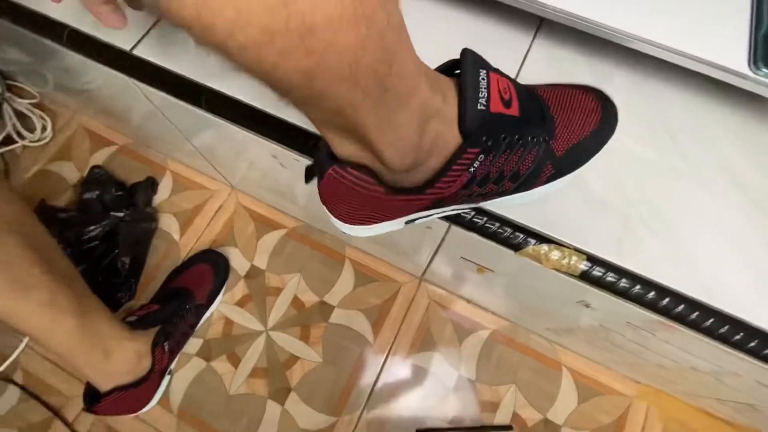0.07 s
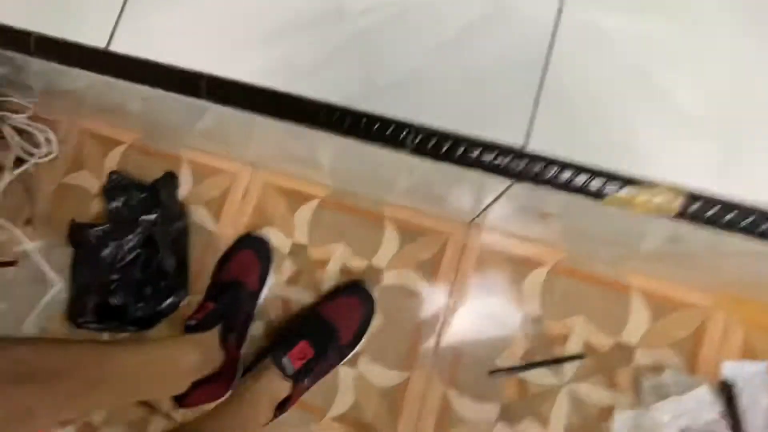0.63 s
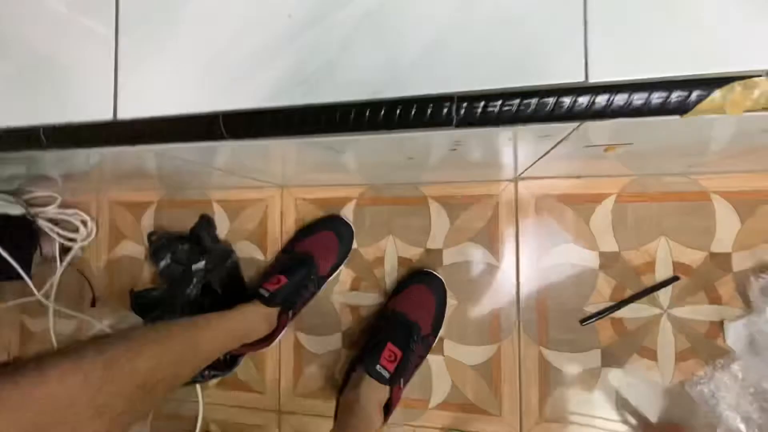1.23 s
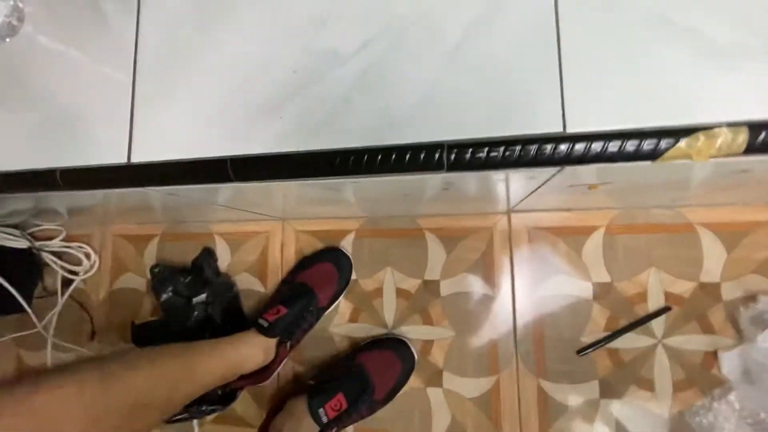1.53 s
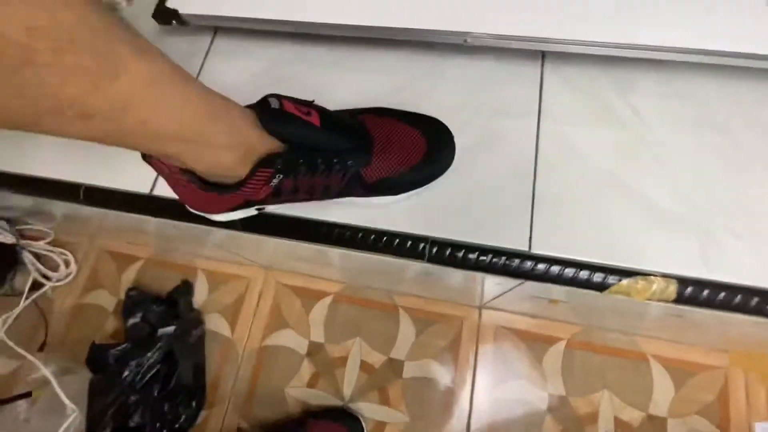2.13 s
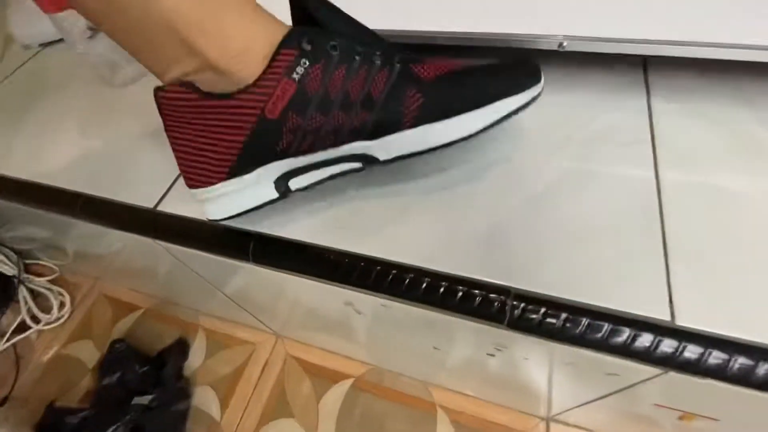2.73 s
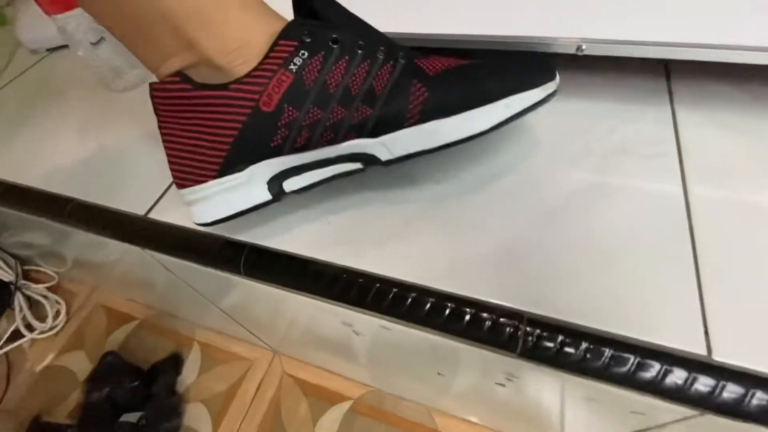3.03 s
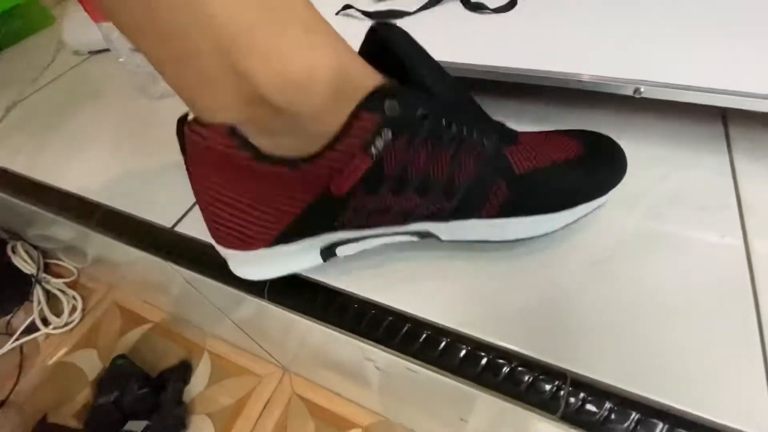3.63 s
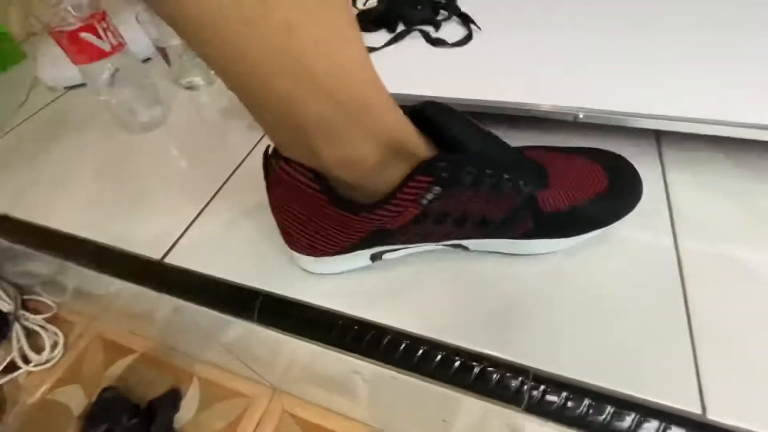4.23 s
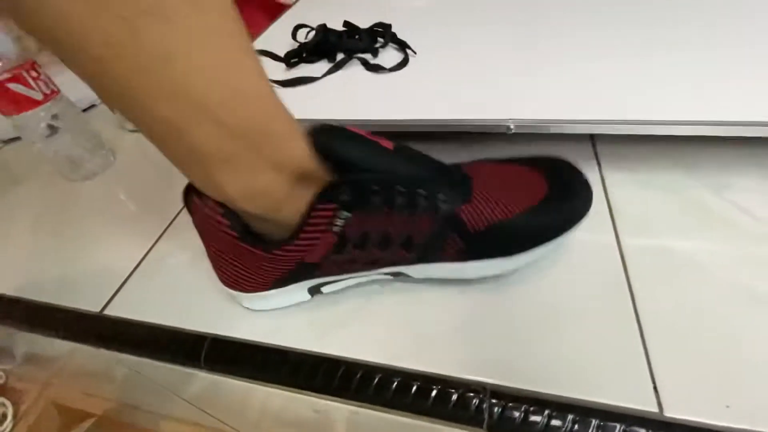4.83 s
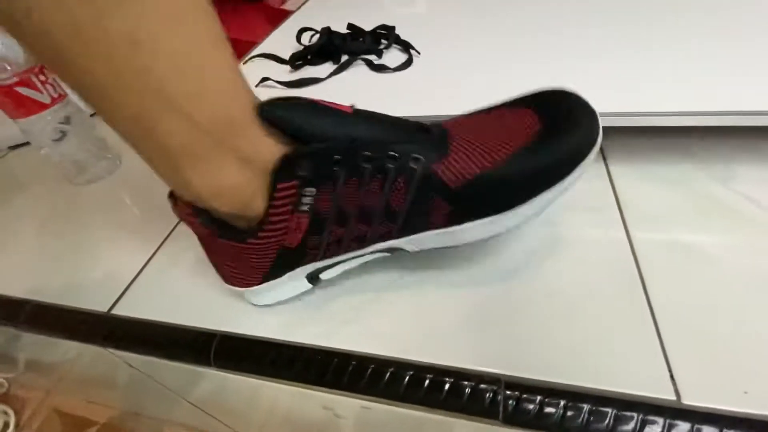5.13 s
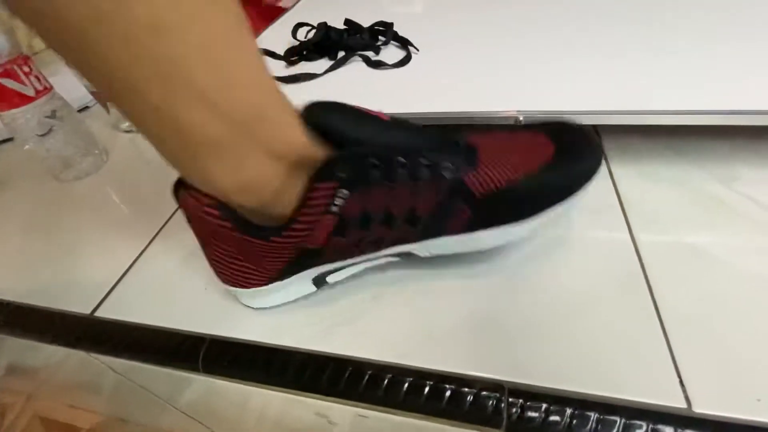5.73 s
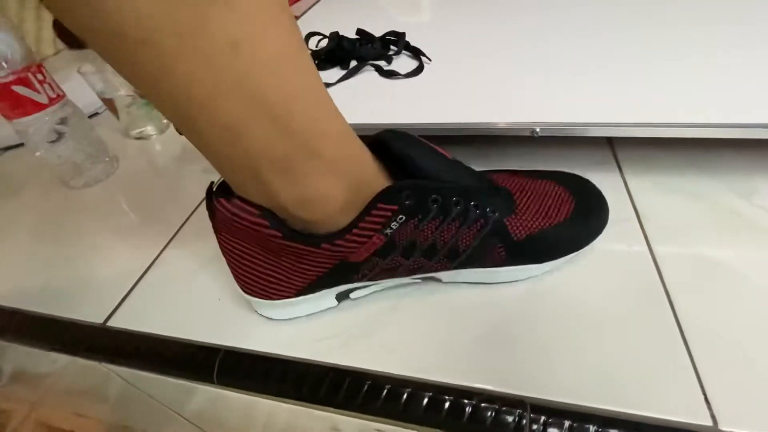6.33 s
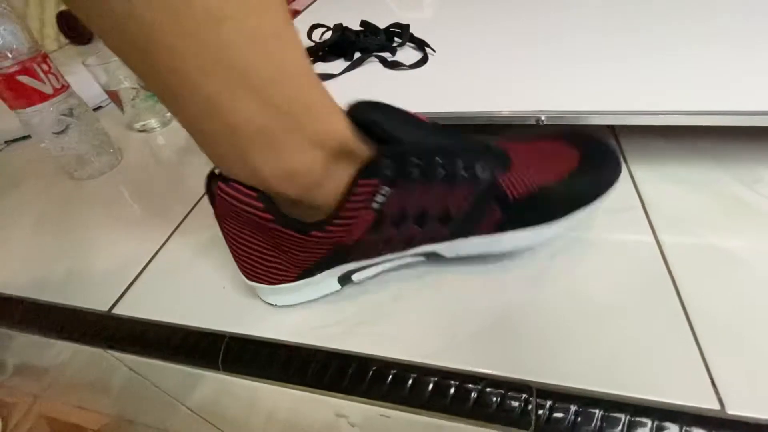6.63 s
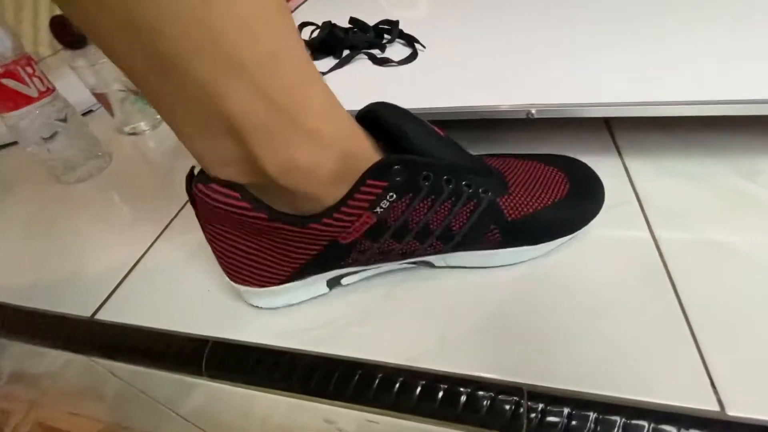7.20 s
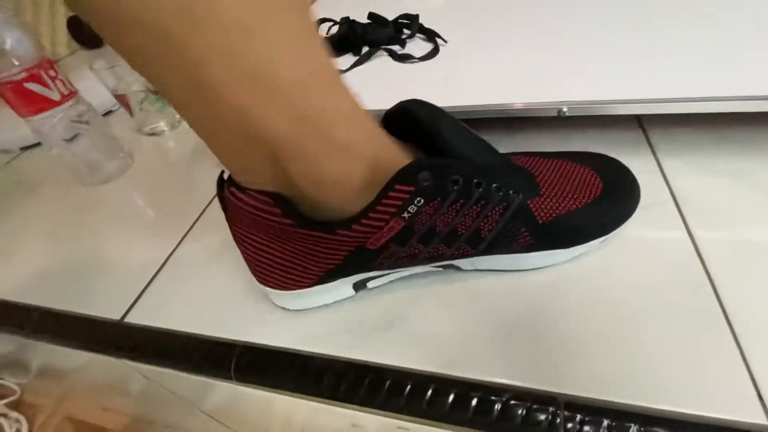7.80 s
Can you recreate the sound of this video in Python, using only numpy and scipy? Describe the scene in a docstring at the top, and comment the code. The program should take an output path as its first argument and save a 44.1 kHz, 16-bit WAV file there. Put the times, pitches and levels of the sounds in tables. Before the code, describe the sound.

A rubber-soled sneaker moves on hard tile, heard close up in a small room that rings briefly. It opens with a light bump and soft fabric rubbing, then a hollow knock at 0.6 seconds as the shoe is set down. From 1 to 1.6 seconds come light bumps and scratchy rustles as a foot works its way in. A step lands at 2.1 seconds, followed by a faint sliding hiss until 2.8 and a near-quiet pause. Another step comes at 3.6 seconds and a heavy one at 4. Six slapping toe taps follow from 4.5 to 6.2 seconds, about three a second, with a sharper seventh at 6.8. Two hard heel stamps hit at 7.4 and 7.7 seconds, slightly to the left, each a knock with a low thump. The knitted upper scuffs softly between hits, above a very faint rumble of air.

```python
"""In a small room with a hard tile floor, a sneaker is put down, then a foot works its way in,
taps it and stamps it. Each touch of the rubber sole is a hollow knock, a slap, a tick and a low
thump, and the room rings briefly. A step rolls over heel, ball and toe, a toe tap is three quick
touches, a stamp is a faint graze and one hard hit. In between, the knitted upper rubs on the foot
and the sole slides over the tile, above a faint rumble of air."""
import sys
import numpy as np
from scipy import signal
from scipy.fft import rfft, irfft, next_fast_len
from scipy.io import wavfile

SR = 44100
rng = np.random.default_rng(int(sys.argv[2]) if len(sys.argv) > 2 else 0)


def store_pcm(level_fs):
    """Save levels as 16-bit WAV."""
    pcm = np.round(np.clip(level_fs, -1, 1) * 32767).astype(np.int16)
    wavfile.write(sys.argv[1], SR, np.atleast_2d(pcm).T)


N = 351036
TIME = np.arange(N) / SR
EAR_GAP_S = 0.00078   # sound's travel time between the left and right listening points
SLAP_HZ = 2260   # pitch of the slap, except in toe taps

# How the room echoes: pitch_hz, level_db, fade_s (time to fall by 60 dB)
ROOM_ECHO = [(59.7, -2.5, 0.84), (116, -12, 0.87), (167, 2, 0.47), (245, -1.5, 0.45), (480, -3.5, 0.29),
             (970, 1.5, 0.25), (2200, 3.5, 0.26), (4430, -3, 0.22), (8100, 4, 0.14), (13300, -26.5, 0.6)]
# Toe taps: start_s, roll_s, first_db, middle_db (these two adjust the early touches),
# then for the last touch: knock_db, pitch_hz, slap_db, slap_hz, tick_db, thump_db
TOE_TAPS = [(4.46, 0.012, 1.5, -8, 11, 650, 5, 1674, -12, 15),
            (4.8303, 0.0095, -7, -17.5, 9.5, 944, 2, 1500, -12.5, 15),
            (5.1682, 0.006, -7.5, -5, 14.5, 600, 12, 2350, -2, 20.5),
            (5.5369, .0052, -2, -5.5, 12, 500, 13, 2010, -4.5, 21),
            (5.886, .005, -1.5, -7.5, 11.5, 475, 11, 2070, -4, 21.5),
            (6.2077, 0.0044, -15.5, -8, 16.5, 735, 17.5, 1800, -0.5, 21.5),
            (6.8483, .0036, -11, -10, 20, 1050, 16, 2350, 0.5, 23)]


def from_db(db):
    """Turn decibels into a gain to multiply by."""
    return 10 ** (np.asarray(db) / 20)


def rms_one(x):
    """Scale a sound to an average strength (rms) of 1."""
    return x / np.sqrt(np.mean(x ** 2) + 1e-20)


def at_hz(table, hz, column=1):
    """Read a table at any pitch, blending between its rows."""
    table = np.array(table)
    return np.interp(np.log(hz + 1), np.log(table[:, 0]), table[:, column])


def pan(left_db):
    """Two gains that make the left side louder than the right by left_db."""
    return from_db(np.array([[.5], [-.5]]) * left_db)


def drift(turns_per_s):
    """A random curve that wanders around 0, typically by 1."""
    points = rng.standard_normal(int(N / SR * turns_per_s) + 2)
    return rms_one(np.interp(TIME * turns_per_s, np.arange(len(points)), points))


def later(x, delay_s):
    """Delay a sound."""
    samples = np.arange(len(x))
    return np.interp(samples - delay_s * SR, samples, x, left=0)


def resonance(x, hz, q):
    """Let a sound ring at one pitch, twice over; a higher q rings longer."""
    b, a = signal.iirpeak(min(hz, .4 * SR), max(q, hz / SR * 2.5), fs=SR)
    return signal.lfilter(b, a, signal.lfilter(b, a, x + 1e-18))


def diffuse_noise(size):
    """Noise from all sides: left and right are alike in the bass, unrelated in the treble."""
    mid, side = rfft(rng.standard_normal((2, size)))
    alike = .9 * np.sinc(2 * EAR_GAP_S * np.fft.rfftfreq(size, 1 / SR))
    return irfft(np.sqrt(1 + alike) * mid + np.sqrt(1 - alike) * side * [[1], [-1]], size)


def coloured(noise, tone):
    """Shape a noise's lows and highs by a tone table, at strength 1."""
    size = next_fast_len(N)
    gains = from_db(at_hz(tone, np.fft.rfftfreq(size, 1 / SR)))
    return rms_one(irfft(rfft(noise, size) * gains, size)[:, :N])


def room_air():
    """A faint, low rumble of air that swells and sinks."""
    # Tone of the air: pitch_hz, level_db
    air_tone = [(15, -50.5), (25, -11.5), (48, 0.5), (70, 8), (87, -11.5), (195, -2.5), (217, -18),
                (624, -31), (911, -37.5), (1130, -37), (1560, -29), (4870, -38.5), (5430, -40),
                (8830, -32.5), (12000, -45), (16000, -67)]
    return from_db(-62.5 + 4.9 * drift(32)) * coloured(diffuse_noise(N), air_tone)


def standing_waves(age):
    """Notes ring between the walls; the higher ones tend to be more out of step left and right."""
    # The room's own notes: pitch_hz, level_db
    wall_notes = [(61, -58), (121, -59), (161, -54), (194, -56), (290, -67.5), (309, -60.5), (331, -64.5),
                  (466, -52.5), (519, -52), (689, -67), (773, -54), (985, -59.5), (1098, -59.5),
                  (1344, -61), (1682, -62), (2129, -61.5), (2415, -54)]
    ringing = 0
    for pitch_hz, level_db in wall_notes:
        phase = np.pi * pitch_hz * EAR_GAP_S * rng.uniform(0.24, 1) * np.array([[1], [-1]])
        fade_db = 60 * age / at_hz(ROOM_ECHO, pitch_hz, column=2)
        ringing = ringing + from_db(level_db - fade_db) * np.cos(2 * np.pi * pitch_hz * age + phase)
    return ringing


def room_echo(x, early_db, early_s, late_db):
    """Nearby furniture answers at once, then the walls ring on, longest in the bass."""
    age = np.arange(SR) / SR
    hz = np.fft.rfftfreq(SR, 1 / SR)
    noise = rfft(diffuse_noise(SR))
    edges_hz = np.geomspace(40, 18000, 19)
    tail = 0
    for low, high in zip(edges_hz, edges_hz[1:]):
        centre_hz = np.sqrt(low * high)
        band = irfft(noise * ((hz >= low) & (hz < high)), SR)
        early = from_db(early_db) * np.exp(-age / early_s)
        late = from_db(late_db - 60 * age / at_hz(ROOM_ECHO, centre_hz, column=2))
        fade = np.hypot(early, late)
        strength = from_db(at_hz(ROOM_ECHO, centre_hz)) * band.std() * np.sqrt(np.mean(fade ** 2))
        tail = tail + strength * rms_one(band * fade)
    fade_in = np.clip(age / 0.0008 - .4, 0, 1)
    echo = (tail + standing_waves(age)) * fade_in
    return signal.fftconvolve(x[None], echo, axes=1)[:, :N]


def friction(tone, snaps_per_s, snap_gain, flutter_db):
    """Surfaces catch and slip: tiny snaps of uneven size on a fluttering hiss."""
    grip = from_db(flutter_db * drift(110))
    sizes = from_db(4 * np.minimum(rng.exponential(1, N), 3.5)) * rng.choice([-1, 1], N)
    snaps = (rng.random(N) < grip * snaps_per_s / SR) * sizes
    return coloured((diffuse_noise(N) + snap_gain * rms_one(snaps)) * grip, tone)


def stroke(start_s, length_s, level_db, swell_db, release_s, attack_s=0.014):
    """Gain of one rubbing movement: it eases in, swells or sags, and dies away."""
    gain = np.zeros(N)
    span = (TIME >= start_s - 2 * attack_s) & (TIME < start_s + length_s + 10 * release_s)
    age = TIME[span] - start_s
    ease_in = 1 / (1 + np.exp(3 * (1 - age / attack_s)))
    held = from_db(level_db + swell_db * np.clip(age / length_s, 0, 1))
    gain[span] = ease_in * held * np.exp(-np.maximum(age - length_s, 0) / release_s)
    return gain


def sole_slide():
    """The sole slides lightly over the glazed tile with a fine hiss."""
    # Tone of rubber on glaze: pitch_hz, level_db
    glaze_tone = [(1470, -35), (2500, -9.5), (5450, -6), (6780, 0), (7640, -9), (8300, -3), (11900, -20.5),
                  (12700, -21), (13000, -53), (15000, -37.5)]
    gain = stroke(start_s=2.07, length_s=0.74, level_db=-62, swell_db=4, release_s=0.086, attack_s=0.11)
    return gain * friction(glaze_tone, snaps_per_s=6600, snap_gain=0.28, flutter_db=-0.5)


def rubbing_strength():
    """Gains of scuff and fabric hiss as the foot rubs and the shoe flexes and catches."""
    # The foot strokes the knitted upper: start_s, length_s, scuff_db, hiss_db, swell_db
    rubs = [(0.0, 0.17, -54, -62.5, -10.5), (0.136, 0.029, -49, -54, -2), (0.195, 1, -64.5, -61.5, -33),
            (0.832, 0.087, -48.5, -52, 3.5), (1.03, 0.063, -45, -43, -4), (1.214, 0.075, -59, -64, 10),
            (1.363, 0.14, -50.5, -61, -2), (1.495, 0.091, -48, -50, 1.5), (1.667, 0.28, -65, -64.5, -10),
            (1.887, 0.27, -62, -64.5, 3), (2.203, 0.43, -59.5, -62.5, -12), (2.559, 0.23, -58, -63, -9),
            (2.81, 0.39, -76.5, -82.5, -5), (3.132, 0.21, -74, -79, 0), (3.454, 0.059, -69, -75, -4.5),
            (3.586, 0.1, -59, -65.5, 2), (3.773, 0.14, -50, -55, -6.5), (3.966, 0.0079, -36, -41, 2),
            (4.09, .3, -61.5, -68.5, 0), (4.586, 0.069, -50, -53, -5), (4.737, 0.025, -58.5, -58, -5),
            (4.921, 0.21, -52.5, -56.5, -12), (5.269, 0.061, -52, -58.5, 0.5),
            (5.627, 0.07, -55, -59.5, 0.5), (5.972, 0.19, -52.5, -56, -15),
            (6.543, 0.084, -52.5, -57.5, -2), (6.618, 0.11, -57, -61, -2.5),
            (7.129, 0.034, -51, -52.5, 5.5), (7.193, 0.029, -49, -52, 6), (7.319, 0.064, -56, -63.5, 10.5),
            (7.566, 0.029, -49, -52, 4), (7.637, 0.048, -52, -57.5, -1)]
    # The shoe catches and lets go with a short rasp: start_s, scuff_db, hiss_db
    rasps = [(1.034, -73, -47), (1.264, -57, -53), (1.382, -42, -56), (2.777, -68, -69), (3.295, -60, -87),
             (3.614, -52, -67), (4.198, -42.5, -55), (4.604, -44, -48), (4.954, -49, -65),
             (5.329, -62, -44), (5.692, -66, -46.5), (6.032, -64, -48), (7.582, -44, -50)]
    flex_s, rasp_decay_s = .028, 0.0027
    # The shoe flexes just before each tap (same columns as rubs).
    flexes = [(tap_s - flex_s, flex_s, -48.5, -59.5, 9) for tap_s, *_ in TOE_TAPS]
    gains = from_db([[-80], [-87.5]]) * np.ones(N)   # the foot is never quite still
    for start_s, length_s, scuff_db, hiss_db, swell_db in rubs + flexes:
        gains[0] = np.maximum(gains[0], stroke(start_s, length_s, scuff_db, swell_db, release_s=0.046))
        gains[1] = np.maximum(gains[1], stroke(start_s, length_s, hiss_db, swell_db, release_s=0.039))
    gains *= from_db(0.8 * drift(49))   # it never presses evenly
    for start_s, scuff_db, hiss_db in rasps:
        start = int(start_s * SR)
        fade = np.exp(-TIME[:min(SR // 4, N - start)] / rasp_decay_s)
        gains[:, start:start + len(fade)] += from_db([[scuff_db], [hiss_db]]) * fade
    return gains


def shoe_rubbing():
    """The foot rubs in the shoe: a dull scuff and a bright hiss of knitted threads."""
    # Tone of the scuff: pitch_hz, level_db
    scuff_tone = [(100, -7.5), (180, -6), (280, -7), (400, -6), (550, -5.5), (950, -3), (1400, -9),
                  (2300, -10), (3500, -16.5), (6000, -34.5)]
    # Tone of the fabric: pitch_hz, level_db
    fabric_tone = [(1200, -19.5), (2500, -2), (3400, -5.5), (4700, -1), (5600, -7), (6700, -1), (7900, -11),
                   (9500, -5.5), (11800, -5), (13200, -35.5), (16000, -33)]
    scuff_gain, hiss_gain = rubbing_strength()
    scuff = from_db(0.5) * friction(scuff_tone, snaps_per_s=400, snap_gain=.65, flutter_db=1.5)
    hiss = from_db(1.0) * friction(fabric_tone, snaps_per_s=670, snap_gain=.8, flutter_db=0.5)
    return scuff_gain * scuff * pan(left_db=1.5) + hiss_gain * hiss * pan(left_db=-1.5)


def moving_contact(x):
    """Resonances of the knit and the sole come and go as the rubbing spot moves."""
    for hz in np.geomspace(600, 10000, 9):
        x = x + .3 * drift(30) * resonance(x, hz, q=1.6)
    return x


def touch_of(start_s, knock_db, pitch_hz, hardness_db, thump_db, room_db, extra_tick_db=0):
    """Settings of one touch: the harder the sole lands, the more slap and tick go with the knock."""
    slap_db = knock_db + hardness_db - 4
    tick_db = knock_db + hardness_db - 18 + extra_tick_db
    return start_s, knock_db, pitch_hz, slap_db, SLAP_HZ, tick_db, thump_db, room_db


def bumps():
    """The sole bumps the tile lightly as the foot shifts in the shoe."""
    # Single touches: start_s, knock_db, pitch_hz, hardness_db, thump_db
    light_bumps = [(0.0452, -12, 1000, -6, -10.5), (0.491, -28.5, 380, -16, -9.5),
                   (0.8515, -12, 900, -11, -20), (1.0723, 4.5, 630, -12, -4.5), (1.1074, 4, 820, -1, 4),
                   (1.2845, -5.5, 470, -2, -3.5), (1.3814, -10.5, 690, 3.5, -1), (1.4375, 4, 734, -13, 0),
                   (1.519, -13, 988, -5, -21), (1.5929, 2.5, 695, -4.5, -1), (2.777, -32, 337, -2, -13),
                   (3.483, -28.5, 400, -23, -19.5), (3.827, -6.5, 826, -1, -12.5),
                   (3.8945, -3, 760, -13, -3), (6.5772, -9.5, 574, -19, -8), (7.1556, -8.5, 913, -6, -16)]
    for bump in light_bumps:
        yield touch_of(*bump, room_db=-1)


def steps():
    """A step lands on heel, ball and toe, changing pitch and hardness along the way."""
    # Steps: start_s, roll_s, heel_db, ball_db, toe_db, heel_hz, toe_hz, heel_hard_db, toe_hard_db
    rolls = [(0.617, .0228, 9.5, 11.5, 15, 580, 876, -8.5, 0),
             (2.0592, 0.03, 13, 13, 10.5, 950, 552, 1, -9), (3.6425, .0335, 14, 10.5, 7, 546, 930, -14, -6),
             (3.9881, .0348, 27, 12.5, 12.5, 611, 740, -12, -0.5)]
    ball_at, ball_tick_db = .64, -5.5   # the ball lands partway through the roll, flat, so it ticks less
    for start_s, roll_s, heel_db, ball_db, toe_db, heel_hz, toe_hz, heel_hard_db, toe_hard_db in rolls:
        for along, db, tick_db in (0, heel_db, 0), (ball_at, ball_db, ball_tick_db), (1, toe_db, 0):
            pitch_hz = heel_hz + along * (toe_hz - heel_hz)
            hardness_db = heel_hard_db + along * (toe_hard_db - heel_hard_db)
            yield touch_of(start_s + along * roll_s, db, pitch_hz, hardness_db,
                           thump_db=db - 2, room_db=-5, extra_tick_db=tick_db)


def taps():
    """With the heel resting, the front of the sole rolls down in three quick touches."""
    middle_at, room_db = .56, -6
    for start_s, roll_s, first_db, middle_db, *last_touch in TOE_TAPS:
        knock_db, pitch_hz, slap_db, slap_hz, tick_db, thump_db = last_touch
        # The early touches have less knock and thump: the weight arrives with the last.
        for after_s, db in (0, first_db), (middle_at * roll_s, middle_db):
            yield (start_s + after_s, knock_db + db - 5, pitch_hz, slap_db + db, slap_hz,
                   tick_db + db, thump_db + db - 25, room_db)
        yield start_s + roll_s, *last_touch, room_db


def stamps():
    """The heel grazes the tile, then hits it flat."""
    # Heel stamps: start_s, knock_db, pitch_hz, slap_db, tick_db, thump_db
    heel_stamps = [(7.4055, 25.5, 725, 18, 2.5, 26), (7.7495, 26.5, 838, 14.5, 1.5, 21.5)]
    graze, hit = (0.017, -34.5, 6), (0, 0, -8)   # lead_s, db, room_db
    for start_s, knock_db, pitch_hz, slap_db, tick_db, thump_db in heel_stamps:
        for lead_s, db, room_db in graze, hit:
            yield (start_s - lead_s, knock_db + db, pitch_hz, slap_db + db, SLAP_HZ,
                   tick_db + db, thump_db + db, room_db)


def housing_tone(x):
    """The shoe and the microphone housing boost some pitches and weaken others."""
    # Broad peaks and dips: pitch_hz, width_hz, level_db
    peaks_and_dips = [(341, 63, 7), (390, 53, -1), (490, 43, 4), (940, 240, 3.5), (1450, 130, 6.5),
                      (2190, 480, 3), (3070, 1500, -6), (4880, 340, 3), (5390, 220, -9.5), (7330, 1100, -4),
                      (11420, 5800, 9.5), (13840, 4200, -23.5)]
    for pitch_hz, width_hz, level_db in peaks_and_dips:
        angle, gain = 2 * np.pi * pitch_hz / SR, from_db(level_db / 2)
        damping = np.sin(angle) * width_hz / pitch_hz / 2
        b = [1 + damping * gain, -2 * np.cos(angle), 1 - damping * gain]
        a = [1 + damping / gain, -2 * np.cos(angle), 1 - damping / gain]
        x = signal.lfilter(b, a, x)
    return x


def footfalls(touches):
    """At each touch the hollow shoe knocks and thumps, the rubber slaps and its hard edge ticks."""
    # Where the sole lands: time_s, heel_share (1 = heel, on the left; 0 = toe, straight ahead)
    landing_spot = [(0, 1), (4.15, 1), (4.4, .15), (7.0, .15), (7.3, 1), (8, 1)]
    heel_lag_s, puff_lag_s = .00016, .003
    direct, to_room = np.zeros((2, N + SR)), np.zeros(N + SR)
    click = signal.unit_impulse(4096)
    age = np.arange(len(click)) / SR
    for start_s, knock_db, pitch_hz, slap_db, slap_hz, tick_db, thump_db, room_db in touches:
        heel = np.interp(start_s, *np.transpose(landing_spot))
        # The tread meets the tile bit by bit and crackles, most of all under the ribbed toe.
        crackle = rng.standard_normal((2, len(age))) * np.exp(-age / .0035)
        tread = .8 * click + (.1 - .06 * heel) * crackle
        tick = resonance(tread, hz=9680, q=0.72)
        slap = resonance(tread, slap_hz, q=0.58) + from_db(-0.5) * resonance(tread, hz=1070, q=4.5)
        knock = resonance(click, pitch_hz, q=0.88 + 0.19 * heel)
        # The toe squeezes out a deep puff of air, heard later on the left; the heel thuds higher.
        thump = -resonance(click, hz=84 + 45 * heel, q=.95 - 0.21 * heel)
        thump = np.array([later(thump, puff_lag_s * (1 - heel)), thump])
        touch = (from_db(knock_db) * knock * pan(left_db=3 + 2.5 * heel)
                 + from_db(slap_db) * slap * pan(left_db=0.5)
                 + from_db(tick_db) * tick * pan(left_db=-3.0)
                 + from_db(thump_db) * thump * pan(left_db=7.0))
        start = int(max(start_s - .0004, 0) * SR)
        to_room[start:start + len(age)] += from_db(room_db) * touch.mean(axis=0)
        touch[1] = np.roll(touch[1], round(heel * heel_lag_s * SR))   # the heel is farther from the right
        direct[:, start:start + len(age)] += touch
    return direct[:, :N], to_room[:N]


def scene():
    """Footfalls with their echo, rubbing, sliding and the room's air."""
    direct, to_room = footfalls([*steps(), *bumps(), *taps(), *stamps()])
    echo = room_echo(to_room, early_db=-20.0, early_s=0.0062, late_db=-30.5)
    rubbing = shoe_rubbing()
    return sole_slide() + room_air() + moving_contact(rubbing) + housing_tone(direct + echo)


def record(dry):
    """Lows lag highs, so each hit is a quick falling chirp; peaks are rounded, deep bass and top cut."""
    lag_at_1khz_s, longest_lag_s = .0011, .026
    bass_cut_hz, treble_cut_hz = 36, 16300
    size = next_fast_len(N + SR)
    hz = np.fft.rfftfreq(size, 1 / SR)
    lag_s = np.minimum(lag_at_1khz_s * 1000 / (hz + 1), longest_lag_s)
    delay = np.exp(-2j * np.pi * np.cumsum(lag_s) * SR / size)
    bass_cut = hz ** 2 / np.hypot(hz ** 2, bass_cut_hz ** 2)
    chirped = irfft(rfft(dry, size) * bass_cut * delay, size)[:, :N]
    rounded = 1.5 * np.tanh(chirped / 1.5)
    treble_cut = signal.ellip(10, .1, 80, treble_cut_hz, fs=SR, output="sos")
    return signal.sosfilt(treble_cut, rounded)


dry = scene()
out = record(dry)
store_pcm(out)
```